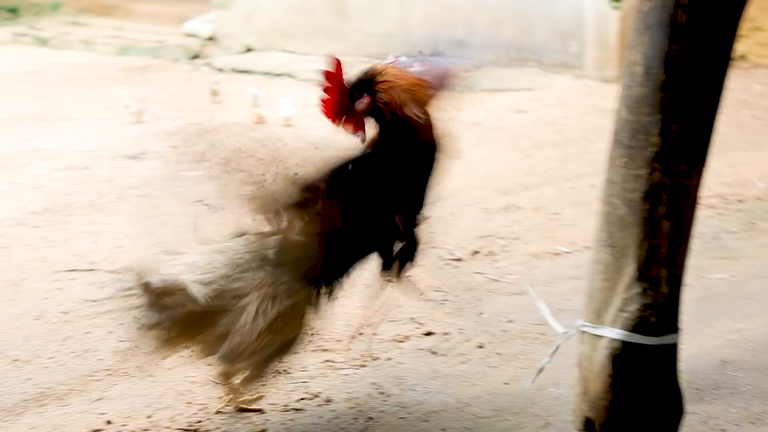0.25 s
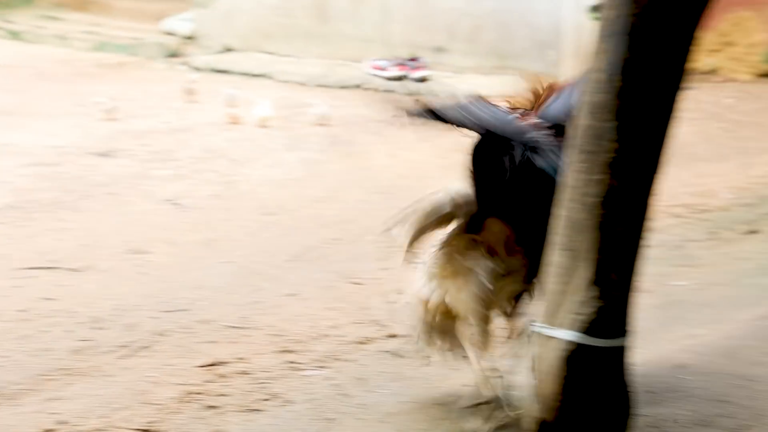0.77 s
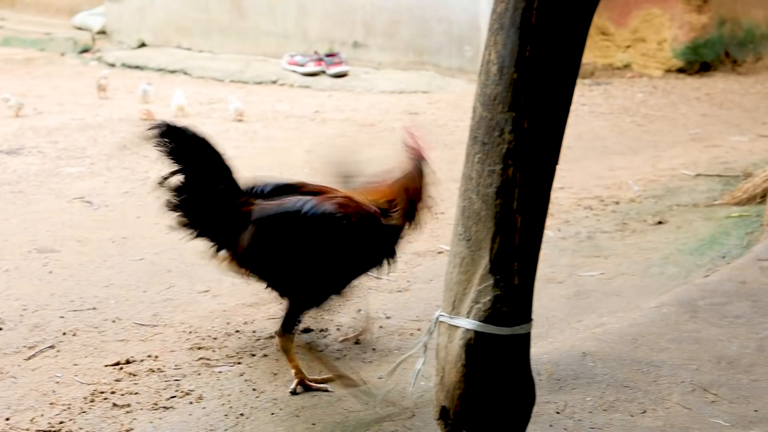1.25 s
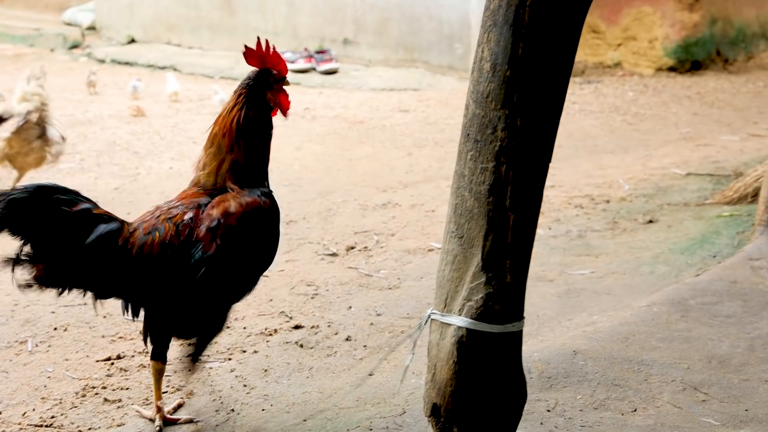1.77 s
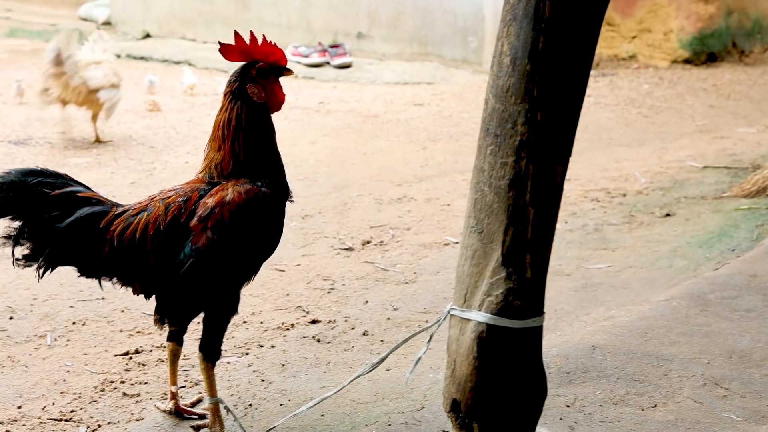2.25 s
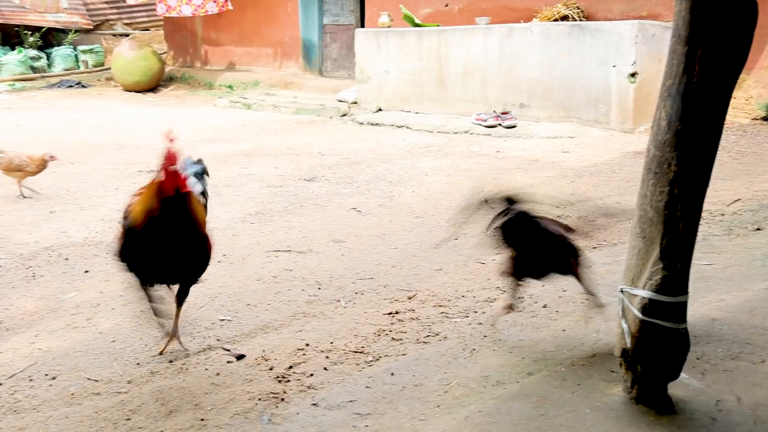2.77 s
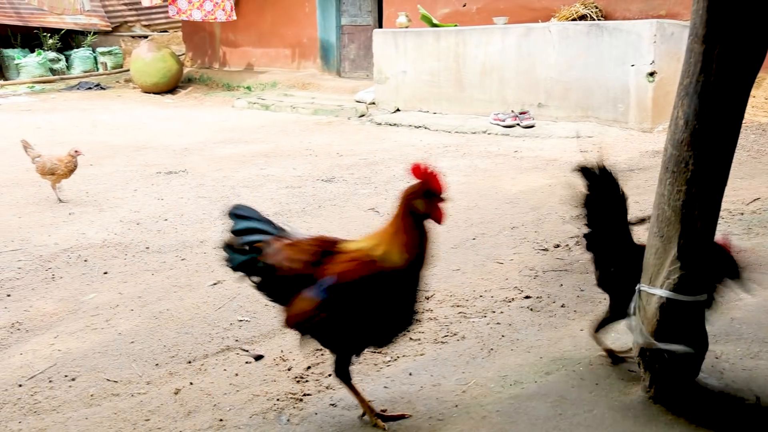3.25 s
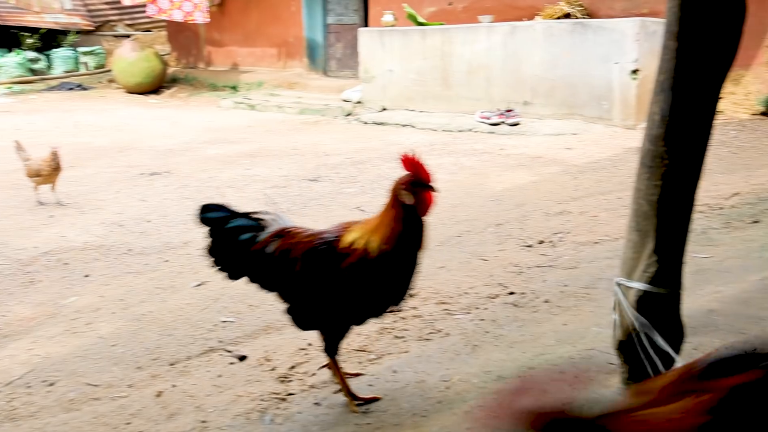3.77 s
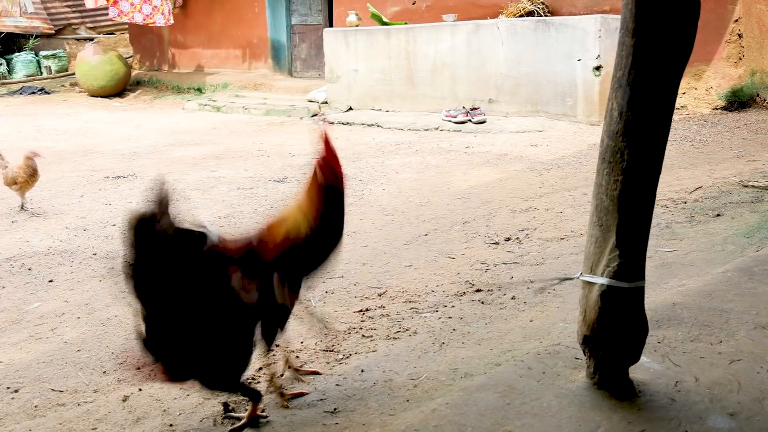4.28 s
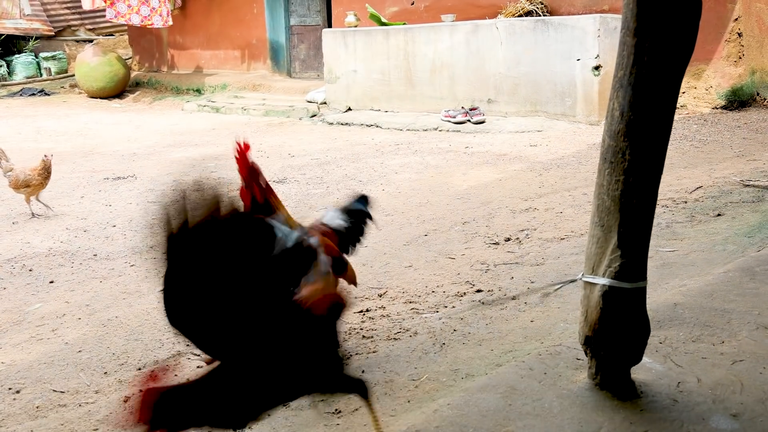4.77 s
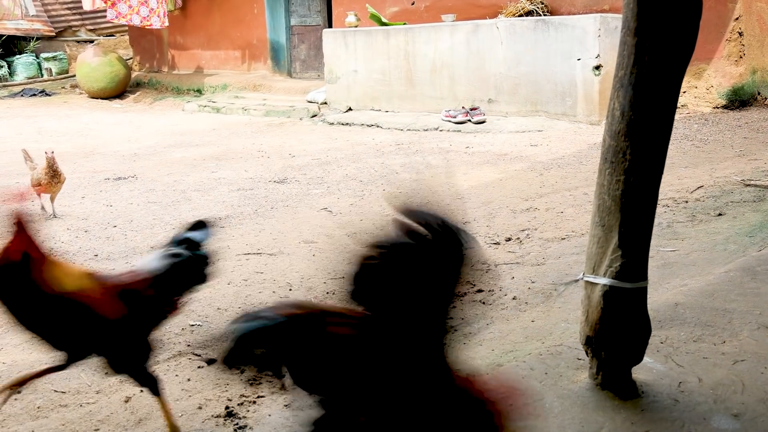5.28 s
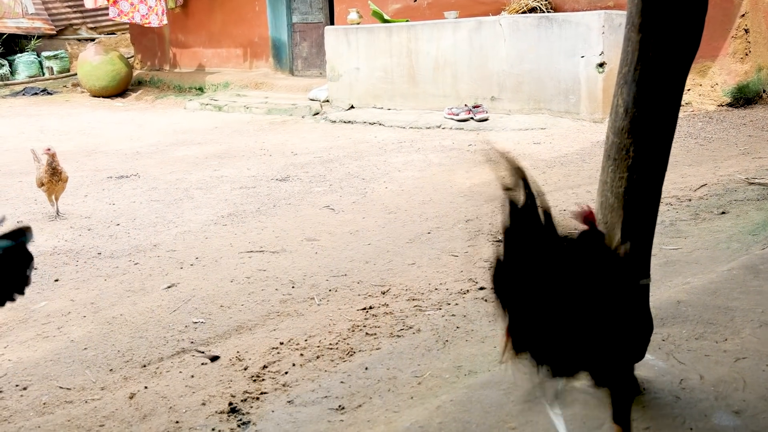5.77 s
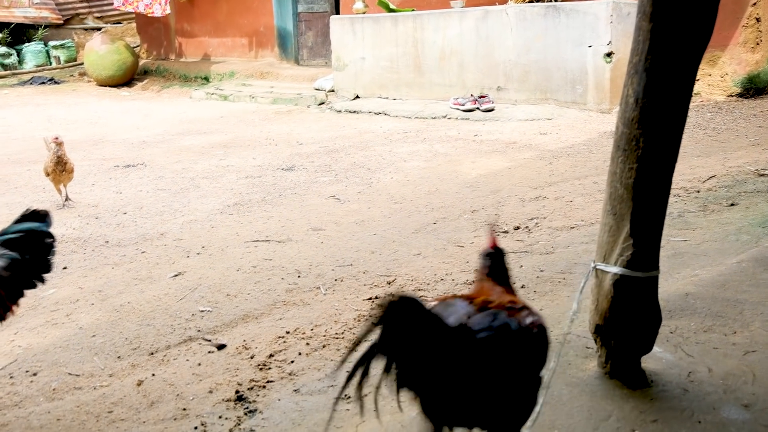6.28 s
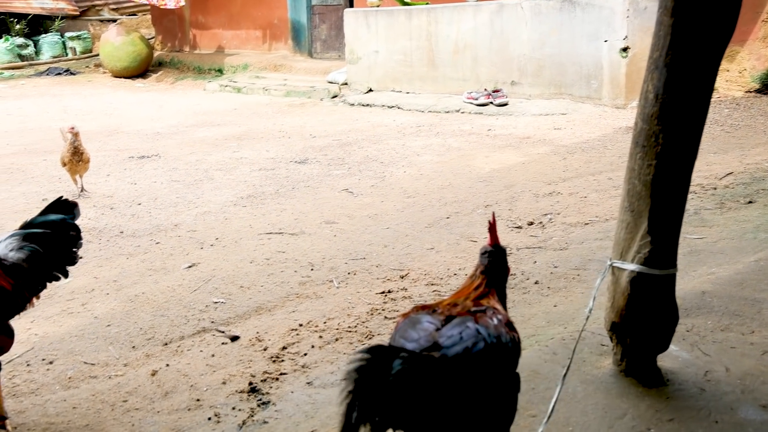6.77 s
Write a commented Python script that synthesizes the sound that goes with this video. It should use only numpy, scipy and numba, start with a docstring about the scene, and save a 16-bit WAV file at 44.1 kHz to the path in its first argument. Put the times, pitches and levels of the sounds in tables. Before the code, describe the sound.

Harsh squawks and short clucks from a scuffling rooster, with thumping wings, scraping claws and faint chick peeps outdoors.

```python
"""A tethered rooster growls, clucks and squawks harshly while scuffling with another in a walled dirt yard.
Its voice is membrane pulses and air noise ringing in throat and beak. Wing beats thump, feathers swish,
claws scrape and grit ticks. Chicks peep nearby; far chirps, a small bird and an insect sound behind them.
Air buffets the microphone, the yard murmurs and the house walls answer each call."""
import sys
import numpy as np
from scipy import signal
from scipy.fft import rfft, irfft, next_fast_len
from scipy.io import wavfile
from scipy.ndimage import uniform_filter1d, map_coordinates
from numba import njit

SR = 44100
rng = np.random.default_rng(int(sys.argv[2]) if len(sys.argv) > 2 else 0)


def unload_wav(signal):
    """Save mono or channel-first audio to the path in sys.argv[1] as 16-bit WAV at rate SR, clipped to [-1, 1]."""
    wavfile.write(
        sys.argv[1],
        SR,
        np.round(np.clip(np.atleast_2d(signal).T, -1, 1) * 32767).astype(np.int16),
    )


N = 310023
TIME_S = np.arange(N) / SR
TOP_HZ = 16000


def amp(db):
    """Decibels to gain."""
    return 10 ** (np.asarray(db) / 20)


def unit(x):
    """Scale to rms 1."""
    return x / np.sqrt(np.mean(x ** 2) + 1e-20)


def along(points, hz):
    """Read (frequency [Hz], value) points on a log axis."""
    knots_hz, values = np.transpose(points)
    return np.interp(np.log(hz + 1), np.log(knots_hz + 1), values)


def curves(rows, t):
    """Read each column after the time at times t."""
    knots, *columns = np.transpose(rows)
    return [np.interp(t, np.sort(knots), column) for column in columns]


def span(start_s, end_s):
    """Sample times of an interval."""
    return TIME_S[max(int(start_s * SR), 0):int(end_s * SR)]


def add(track, t, sound):
    """Mix a sound into a track at times t."""
    track[..., round(t[0] * SR):][..., :len(t)] += sound


def wobble(knots_per_s, size):
    """Smooth random curve."""
    knots = rng.standard_normal(int(size * knots_per_s / SR) + 4)
    return map_coordinates(knots, [np.arange(size) * knots_per_s / SR])


def filtered(x, response):
    """Zero-phase filter with gain response(hz)."""
    size = x.shape[-1]
    padded = next_fast_len(size + SR // 8)
    return irfft(rfft(x, padded) * response(np.fft.rfftfreq(padded, 1 / SR)), padded)[..., :size]


def coloured(x, spectrum):
    """Filter by (frequency [Hz], gain [dB]) points."""
    return filtered(x, lambda hz: amp(along(spectrum, hz)))


@njit
def resonate(x, hz, width_hz):
    """Moving two-pole resonance, peak gain 1."""
    y = np.zeros(len(x))
    r = np.exp(-np.pi * width_hz / SR)
    for i in range(2, len(x)):
        drive = (1 - r * r) / 2 * (x[i] - x[i - 2])
        y[i] = drive + 2 * r * np.cos(2 * np.pi * hz[i] / SR) * y[i - 1] - r * r * y[i - 2]
    return y


# Likeness of the two microphone ports: (frequency [Hz], coherence [0-1])
PORT_COHERENCE = [(140, 0.025), (300, 1), (600, 0.76), (1500, 0.47), (5000, 0.033)]
def noise(spectrum, size, treble_db=0):
    """Stereo noise of rms 1, most coherent in the midrange."""
    def response(hz):
        angle = np.arccos(along(PORT_COHERENCE, hz)) / 2
        gain = amp(along(spectrum, hz) + treble_db * along([(1000, 0), (8000, 1)], hz))
        return gain * [np.cos(angle), np.sin(angle)]
    mid, side = filtered(rng.standard_normal((2, size)), response)
    return unit(np.array([mid + side, mid - side]))


# Background levels: (time [s], buffeting [dB], yard murmur [dB])
AIR_LEVELS = [(0, -49, -47.5), (.95, -50, -46.5), (1.05, -37, -47), (2.5, -36.5, -51), (2.6, -57.5, -48),
              (5.2, -59, -52), (5.5, -79.5, -56.5), (6.05, -58.5, -59.5), (6.55, -57, -51.5)]
# Turbulence at a port: (frequency [Hz], density [dB])
BUFFET_SPECTRUM = [(20, -33.5), (65, -0.5), (110, 1.5), (200, -6), (450, -25.5), (900, -62)]
def buffeting():
    """Air hits each port in separate low gusts."""
    level_db, _ = curves(AIR_LEVELS, TIME_S)
    gusts = unit(amp(4 * np.array([wobble(22, N), wobble(22, N)])))
    return amp(level_db) * gusts * noise(BUFFET_SPECTRUM, N) * amp([[-2], [2]])


def insect(trill_hz=6):
    """Far trill: a narrow, pulsing noise band."""
    band = noise([(5400, -45), (6300, 0.5), (6700, -3.5), (7100, -42.5)], N)
    return amp(-12 + 1.3 * np.sin(2 * np.pi * trill_hz * TIME_S)) * band


# Yard murmur: (frequency [Hz], density [dB])
YARD_SPECTRUM = [(60, -23), (150, -1.5), (350, -5.5), (550, -11), (1800, -16.5), (6000, -25), (15000, -42)]
def yard():
    """Murmur and insect waver together in level."""
    _, level_db = curves(AIR_LEVELS, TIME_S)
    trill = insect()
    return amp(level_db + 2.5 * wobble(7.6, N)) * (noise(YARD_SPECTRUM, N) + trill)


def whistle(pitch_hz, blur):
    """Nearly pure bird tone; blur is the relative pitch jitter."""
    phase = 2 * np.pi * np.cumsum(pitch_hz * (1 + blur * wobble(506, len(pitch_hz)))) / SR
    return np.sin(phase) + amp(-29) * np.sin(2 * phase)


# Whistled glide: (time [s], pitch [Hz], level [dB])
BIRD_GLIDE = [(6.13, 7740, -70), (6.212, 5620, -59), (6.259, 5380, -71), (6.29, 5530, -74)]
def small_bird():
    """One faint whistle sliding down."""
    out = np.zeros(N)
    t = span(BIRD_GLIDE[0][0], BIRD_GLIDE[-1][0])
    pitch_hz, db = curves(BIRD_GLIDE, t)
    add(out, t, amp(db) * whistle(pitch_hz, blur=0.0039))
    return out


# Falling chirps: the first three are straight sliding peeps of another chick, the rest distant chirps: (time
# [s], top pitch [Hz], level [dB], length [s])
FALLING_CHIRPS = [(1.485, 4850, -47.5, .055), (1.745, 4800, -49, .052), (2.06, 4800, -52, .058),
                  (2.58, 5800, -56, .1), (2.755, 6410, -51.5, .1), (3.21, 6000, -57, .1), (3.83, 4800, -55, .1),
                  (4.33, 4750, -53.5, .1)]
def falling_chirps(fall=0.17, blur_per_s=0.55):
    """Thin falling chirps; the longer, distant ones blur more."""
    out = np.zeros(N)
    for s, top_hz, db, length_s in FALLING_CHIRPS:
        t = span(s, s + length_s)
        tone = whistle(top_hz * (1 - fall * (t - s) / length_s), blur_per_s * length_s)
        add(out, t, amp(db) * signal.windows.tukey(len(t), 0.6) * tone)
    return out


# Chick peeps: (time [s], top pitch [Hz], relative level [dB], length [s])
CHICK_PEEPS = [(.09, 4607, -37, 0.085), (0.397, 4620, -37, 0.11), (0.684, 4610, -35, 0.081),
               (1.033, 4580, -37, 0.12), (1.907, 4290, -48.5, 0.075), (2.231, 4330, -46.5, 0.087),
               (2.355, 3900, -51.5, 0.076), (2.476, 4500, -50, 0.12)]
# Pitch arch of a peep: (progress [0-1], share of top pitch [0-1])
PEEP_CONTOUR = [(0, .94), (.2, 1), (.46, .99), (.6, .93), (.72, .73), (1, .62)]
def chicks():
    """Each peep holds a high arch, then breaks to a low note."""
    out = np.zeros(N)
    for s, top_hz, db, length_s in CHICK_PEEPS:
        t = span(s, s + length_s)
        pitch_hz = top_hz * curves(PEEP_CONTOUR, (t - s) / length_s)[0]
        add(out, t, amp(db - 2.5) * signal.windows.tukey(len(t), 0.2) * whistle(pitch_hz, blur=0.0095))
    return out


# Bouts of struggling: (start [s], end [s], level [dB])
STRUGGLES = [(0, 1.2, -51), (0.282, 0.846, -47), (1.394, 1.462, -44.5), (2.58, 2.964, -44),
             (3.143, 3.556, -42), (3.36, 3.38, -36), (3.823, 4.12, -45.5), (4.26, 5.313, -49.5),
             (6.346, 7.033, -57)]
# Feathers and dust: (frequency [Hz], density [dB])
RUSTLE_SPECTRUM = [(300, -20), (1000, 7), (3000, 2.5), (5000, 0.5), (8000, -5), (15000, -9)]
def rustle(attack_s=0.014, release_s=0.095, calm_db=-61.5):
    """Each bout stirs feathers and dust, which settle to a faint floor."""
    power = amp(calm_db) ** 2
    for start_s, end_s, db in STRUGGLES:
        edge = np.minimum((TIME_S - start_s) / attack_s, (end_s - TIME_S) / release_s)
        power += (amp(db) * np.exp(np.minimum(0, edge))) ** 2
    grains = unit(amp(1.8 * wobble(30, N) + 3.5 * wobble(900, N)))
    return np.sqrt(power) * grains * noise(RUSTLE_SPECTRUM, N)


# Grit and quill clicks: (time [s], level [dB])
GRIT_TICKS = [(.077, -36.5), (.35, -35.5), (.375, -28), (1.926, -38), (2.2696, -17), (2.689, -22.5),
              (2.7379, -24), (2.871, -31), (3.3524, -28)]
def ticks(decay_s=0.0014):
    """Grit and quills click by the microphone, too near to echo."""
    out = np.zeros((2, N))
    for s, db in GRIT_TICKS:
        t = span(s, s + 0.021)
        hiss = noise([(800, -12.5), (4500, -6), (16000, -12.5)], len(t))
        add(out, t, amp(db) * np.exp((s - t) / decay_s) * hiss)
    return out


# Swishes and scrapes: (peak time [s], level [dB], decay [s], treble [dB])
SCUFF_STROKES = [(0.335, -31, 0.033, -7.5), (0.49, -28, 0.024, -6.5), (0.584, -28, 0.02, -1.5),
                 (0.739, -34, 0.037, -1), (2.575, -29, 0.011, -8.5), (2.738, -27, 0.0052, -12),
                 (2.881, -29, 0.012, -4.5), (2.921, -31.5, 0.025, -10), (3.237, -24.5, 0.011, -35.5),
                 (3.405, -28.5, 0.0091, 7.5), (3.575, -21.5, 0.0065, 27), (4.005, -26.5, 0.018, 0),
                 (4.059, -33, 0.0065, -16), (4.107, -33.5, 0.014, -4.5), (4.19, -27.5, 0.01, -8),
                 (4.295, -32, 0.018, 7.5), (4.552, -33.5, 0.022, -14)]
# Feather friction: (frequency [Hz], density [dB])
FEATHER_SPECTRUM = [(100, -4.5), (350, -5.5), (1000, -2.5), (2500, -6), (5000, -8), (8000, -15),
                    (16000, -18)]
def scuffle(snaps_per_s=260, snap_decay_s=0.00047, snap_db=-6):
    """Feathers and claws rub in a grainy hiss; quills snap past each other."""
    out = np.zeros((2, N))
    for s, db, decay_s, treble_db in SCUFF_STROKES:
        rise_s = decay_s ** 2 / 0.031  # short scrapes strike, long swishes swell
        t = span(s - 4 * rise_s, s + 5 * decay_s)
        stroke = np.exp(np.minimum((t - s) / rise_s, (s - t) / decay_s))
        triggers = rng.random(len(t)) < snaps_per_s / SR
        snaps = signal.lfilter([1], [1, -np.exp(-1 / (snap_decay_s * SR))], triggers)
        friction = unit(amp(2 * wobble(700, len(t))))
        grains = unit(friction + amp(snap_db) * unit(snaps))
        add(out, t, amp(db) * stroke * grains * noise(FEATHER_SPECTRUM, len(t), treble_db))
    return out


# Downstrokes: (time [s], relative level [dB], pitch [Hz])
WING_BEATS = [(0.029, -33.5, 105), (0.329, -20, 148), (1.004, -25, 84), (1.032, -22, 230), (1.439, -21, 97),
              (1.82, -25, 130), (2.104, -17, 161), (2.179, -24, 96), (2.2, -17, 126), (2.237, -19.5, 197),
              (2.316, -20.5, 163), (2.89, -30.5, 183), (3.243, -35, 322), (3.491, -33, 190),
              (4.091, -35.5, 230), (4.191, -29.5, 305), (5.033, -38.5, 278), (5.17, -33.5, 181)]
def wings():
    """A downstroke pushes and pulls the air once; its turbulent puff differs at each port."""
    out = np.zeros((2, N))
    for s, db, hz in WING_BEATS:
        t = span(s - 0.025, s + 0.15)
        cycles = (t - s) * hz + rng.normal(0, 0.039, (2, 1))
        push = -np.sin(2 * np.pi * cycles) * np.exp(-(cycles / 0.67) ** 2)
        puff = 0.77 * np.exp(-np.abs(t - s) / 0.008) * noise(BUFFET_SPECTRUM, len(t))
        add(out, t, amp(db) * (push + puff) * amp([[-2], [1]]))
    return out


BEAK_TRADE = 1.05  # dB of beak resonance gained per dB of throat share lost
# Radiation from the beak: (frequency [Hz], gain [dB])
BEAK_RADIATION = [(120, -14), (300, 3), (450, 1), (1500, 2.5), (3000, -1), (4100, -2), (4900, -5.5),
                  (5700, -1.5), (7000, -11.5), (8500, -17), (16000, -32)]
def syrinx(pitch_hz, effort_db, rough, throat_hz, beak_hz, beak_db, upper_hz, upper_db,
           throat_width_hz, beak_width_hz, rasp_db, jitter=0.073, air_gain=1.36, smear=0.5):
    """Membrane pulses and pulsed air ring in throat, beak and an upper resonance; steady rms 1."""
    size = len(pitch_hz)
    rough = np.clip(rough, 0, 1)
    drift = 1 + jitter * rough * (wobble(600, size) + wobble(140, size))
    phase = 2 * np.pi * np.cumsum(pitch_hz * drift) / SR
    k = np.arange(1, 41)[:, None]
    harmonics = np.cos(k * phase + smear * k * k)  # the long windpipe smears each pulse
    pulses = np.sum(harmonics * (k * pitch_hz < TOP_HZ), axis=0) * np.sqrt(2 * pitch_hz / TOP_HZ)
    # a strained membrane beats unevenly, slips to half pitch and leaks air once a cycle
    pulses *= amp(5.3 * rough * wobble(600, size))
    pulses *= 1 + rough * (1 + wobble(90, size)) * np.cos(phase / 2)
    air = unit(rng.standard_normal(size) * (1 + np.cos(phase)))
    source = np.sqrt(1 - rough ** 2) * pulses + air_gain * rough * air

    def cavity(hz, width_hz):
        hz = hz * np.ones(size)
        return resonate(resonate(source, hz, width_hz), hz, width_hz)
    throat = cavity(throat_hz, throat_width_hz)
    beak = amp(beak_db) * cavity(beak_hz, beak_width_hz)
    rasp = amp(rasp_db + 0.56 * effort_db) * source  # louder calls are brighter
    treble = (1 + amp(beak_db)) * (amp(upper_db) * cavity(upper_hz, 620) - rasp)
    tone = coloured(throat + beak + treble, BEAK_RADIATION)
    return tone / np.sqrt(np.abs(uniform_filter1d(tone ** 2, size=360)) + 1e-12)


# Rattling growl: (time [s], level [dB], throat [Hz], beak [Hz], throat share [dB],
# upper resonance [Hz], rattle depth [0-1])
GROWL_TRACK = [(1.04, -27, 1170, 1259, 14, 3200, 0.88), (1.08, -28.5, 1140, 1256, 5, 3200, 0.97),
               (1.125, -24.5, 1030, 1679, -3.5, 3150, 0.4), (1.172, -22, 1090, 1695, -8.5, 3300, 0.15),
               (1.235, -28.5, 856, 1505, 0, 3400, 0.77), (1.268, -21.5, 765, 1441, -3, 3920, 0.72),
               (1.335, -25.5, 770, 1381, -3.5, 3800, 0.93), (1.405, -25, 740, 1336, 0, 3850, .7),
               (1.44, -34, 697.5, 1260, 1, 3905, 0.4)]
# Colour of the rattle: (frequency [Hz], gain [dB])
GROWL_COLOUR = [(1800, 1), (4300, 4), (5200, -4), (7000, -8)]
def growl(rattle_hz=58, rattle_db=5, swap_db=9):
    """A flutter chops the voice into bursts: the throat sounds in each, the beak between them."""
    t = span(GROWL_TRACK[0][0], GROWL_TRACK[-1][0])
    db, throat_hz, beak_hz, throat_db, upper_hz, depth = curves(GROWL_TRACK, t)
    flutter = 2 * np.pi * np.cumsum(rattle_hz * (1 + 0.14 * wobble(50, len(t)))) / SR
    burst = depth * np.cos(flutter)
    bend = 1 - 0.1 * depth * np.sin(flutter)
    beak_db = -3.5 - BEAK_TRADE * throat_db - swap_db * burst
    tone = syrinx(0.49 * beak_hz * bend, db, rough=0.54, throat_hz=throat_hz * bend,
                  beak_hz=beak_hz, beak_db=beak_db, upper_hz=upper_hz, upper_db=-20 + 1.8 * burst,
                  throat_width_hz=294, beak_width_hz=340, rasp_db=-18)
    chop = unit(amp(rattle_db * burst + 2.2 * wobble(70.3, len(t))))
    return t, coloured(tone, GROWL_COLOUR) * amp(db) * chop * signal.windows.tukey(len(t), 0.04)


# Clucks: (peak time [s], level [dB], pitch [Hz], half length [s], throat [Hz], beak [Hz],
# beak over throat [dB])
CLUCK_CALLS = [(1.555, -29.5, 356, 0.0052, 764, 970, -13), (1.585, -23, 389, .0073, 766, 930, -9),
               (1.614, -22, 409.5, 0.0095, 820, 1140, 2.5), (1.698, -18, 441.7, 0.0087, 900, 1230, 4.5),
               (1.888, -30.5, 348.6, 0.0092, 717, 960, -19), (1.913, -26.5, 386.4, 0.0042, 760, 970, -23),
               (2.141, -32.5, 357, 0.0097, 680, 990, -14), (2.165, -29, 372, .0035, 740, 1090, -18),
               (2.253, -17.5, 353.2, 0.0066, 800, 1320, 5),
               (2.333, -30.5, 411.6, 0.0084, 1026, 1270, -13.5),
               (2.404, -28.5, 375.4, .012, 714, 1000, -13.5), (2.51, -18.5, 425.5, 0.0074, 900, 1190, 8),
               (3.734, -20, 372.8, .013, 724, 1750, 6.5), (3.964, -20.5, 428.6, .011, 520, 1174, 8),
               (3.986, -24.5, 401.7, 0.0076, 1040, 1250, -5.5),
               (4.89, -10.5, 544, 0.0074, 1596, 2120, -4.5), (5.06, -16, 554, 0.0093, 1250, 1793, 4),
               (5.527, -18, 356, 0.014, 866, 1625, 8), (5.739, -24, 369.5, 0.014, 740, 1590, 2.5),
               (6.48, -42.5, 361.5, .018, 660, 1073, -0.5)]
# The body carries the fundamental: (frequency [Hz], gain [dB])
CHEST_COLOUR = [(250, 1), (400, 6.5), (600, 1), (3000, -1), (4800, -4), (6000, -1)]
def clucks(typical_db=-19, sag=0.1025):
    """Short pushes of air; pitch arches with effort, and onset and end are hoarse."""
    for s, db, top_hz, half_s, throat_hz, beak_hz, beak_db in CLUCK_CALLS:
        t = span(s - 2.3 * half_s, s + 3 * half_s)
        effort = 1 / (1 + ((t - s) / half_s) ** 4)
        excess_db = db - typical_db
        rough = 0.33 - 0.05 * excess_db + 0.51 * (1 - effort)  # louder is clearer
        pitch_hz = top_hz * (1 - sag * (1 - effort))
        tone = syrinx(pitch_hz, db, rough, throat_hz, beak_hz, beak_db,
                      upper_hz=3450, upper_db=-19 + 0.67 * excess_db,
                      throat_width_hz=252, beak_width_hz=317, rasp_db=-20, smear=0.11)
        yield t, amp(db) * effort * coloured(tone, CHEST_COLOUR)


# Effort and mouth, one list per squawk: (time [s], level [dB], beak [Hz], throat share [dB])
SQUAWK_EFFORT = [
    [(3.06, -44, 1710, 5), (3.07, -25, 1700, -4), (3.1, -24, 2020, -3.5), (3.188, -22.5, 1570, -3.5),
     (3.222, -32, 1620, 1), (3.232, -49, 1590, 8)],
    [(3.27, -43, 2830, -1), (3.29, -24.5, 2830, -3), (3.345, -26, 3020, -17.5), (3.364, -16, 3280, -23),
     (3.38, -21.5, 2880, -3), (3.402, -11.5, 2780, -8.5), (3.43, -27.5, 2580, -21)],
    [(3.485, -48, 2250, 0), (3.501, -18, 2250, 7), (3.533, -21, 2580, -20), (3.557, -12, 2870, -24.5),
     (3.581, -17, 1910, -11), (3.605, -48, 2100, 5)],
    [(4.595, -32, 1820, 6), (4.632, -16, 1800, -4), (4.68, -15, 1960, -7), (4.704, -19.5, 2340, -3),
     (4.73, -10.5, 2570, -15.5), (4.746, -14.5, 1880, -3.5), (4.78, -30, 1660, -14.5)],
    [(5.19, -41, 2000, 0), (5.204, -17, 2120, -8), (5.244, -17.5, 2040, -10), (5.274, -13, 2750, -14.5),
     (5.318, -12.5, 2760, -13.5), (5.35, -11, 2100, -22.5), (5.37, -15, 1850, -26.5),
     (5.382, -36.5, 1980, -14)],
]
# Membranes, one list per squawk; leaps are register cracks: (time [s], pitch [Hz], roughness [0-1])
SQUAWK_MEMBRANES = [
    [(3.06, 586, 0.78), (3.11, 620, 0.03), (3.128, 576, 0.28), (3.148, 393, 0.24), (3.2, 390, 0.17),
     (3.23, 355, 0)],
    [(3.272, 659.6, 0.26), (3.305, 764, 0.48), (3.345, 764, 0.03), (3.354, 1115, 0.41), (3.375, 1071, 0.27),
     (3.402, 734.5, 0.96), (3.425, 609, 1)],
    [(3.492, 666.3, 0.27), (3.505, 780, 0.35), (3.527, 823, 0.75), (3.548, 763.5, 0.16), (3.567, 727, 0.26),
     (3.582, 532, 0.5)],
    [(4.59, 695, 0.67), (4.634, 849.6, 0.51), (4.667, 847.7, 0.38), (4.685, 1032, 0.6), (4.7, 1040, 0.61),
     (4.718, 1160, 0.76), (4.736, 871.5, 0.55), (4.775, 780, 0.4)],
    [(5.19, 817, 0.58), (5.225, 955, 0.77), (5.272, 976.6, 0.6), (5.289, 1482, 0.47), (5.3, 1319, 0.2),
     (5.315, 1390, 0.12), (5.325, 1446, 0.42), (5.335, 1392, 0.1), (5.343, 1400, 0), (5.347, 698, 0.01),
     (5.38, 640, 0.33)],
]
# Wide-open beak: (frequency [Hz], gain [dB])
SQUAWK_COLOUR = [(400, 4), (800, 2), (4300, 0), (5500, -1.5), (9000, 1.5)]
def squawks(throat_rest_hz=757, tremble=0.02):
    """Forced, shaking calls; the throat tunes up to high pitches while the beak opens and shuts."""
    for effort, membranes in zip(SQUAWK_EFFORT, SQUAWK_MEMBRANES):
        t = span(effort[0][0], effort[-1][0])
        db, beak_hz, throat_db = curves(effort, t)
        pitch_hz, rough = curves(membranes, t)
        pitch_hz *= 1 + tremble * wobble(130, len(t))
        throat_hz = np.maximum(throat_rest_hz, pitch_hz)
        tone = syrinx(pitch_hz, db, rough, throat_hz, beak_hz, beak_db=-3 - BEAK_TRADE * throat_db,
                      upper_hz=1.44 * beak_hz, upper_db=-13, throat_width_hz=290, beak_width_hz=740,
                      rasp_db=-16, jitter=0.0729, air_gain=1.45)
        tone -= resonate(tone, 0.4 * pitch_hz, 400)  # notch below the fundamental
        yield t, coloured(tone, SQUAWK_COLOUR) * amp(db) * signal.windows.tukey(len(t), 0.04)


# Position of the caller: (time [s], left port lag [ms], left over right [dB])
ROOSTER_POSITION = [(1.2, -0.064, 0), (2.5, -0.088, 0), (3.1, 0.11, -2.5), (4, 0.088, 0.5),
                    (4.65, -0.061, 0), (5.05, -0.13, -0.5), (5.3, -.057, 0), (5.52, 0.093, -0.5)]
def rooster(split_hz=750):
    """All calls; lows reach both ports alike, treble shifts in level and delay with position."""
    voice = np.zeros(N)
    for t, call in [growl(), *squawks(), *clucks()]:
        add(voice, t, call)
    low = filtered(voice, lambda hz: 1 / (1 + (hz / split_hz) ** 4))
    lag_ms, pan_db = curves(ROOSTER_POSITION, TIME_S)
    ports = []
    for side in (0.5, -0.5):
        treble = map_coordinates(voice - low, [np.arange(N) - side * lag_ms * SR / 1000])
        ports.append(low + amp(side * pan_db) * treble)
    return np.array(ports)


# Yard reverberation: (frequency [Hz], T60 [s])
WALL_DECAY = [(200, 0.29), (800, 0.43), (2000, 0.29), (5000, 0.068), (12000, 0.12)]
def wall_echo(x, tail_db=-16):
    """The walls return four early slaps on a thin tail, different at each port."""
    hz, t, spectra = signal.stft(rng.standard_normal((2, SR // 2)), SR, nperseg=256)
    decay = amp(-60 * t / along(WALL_DECAY, hz)[:, None])
    _, response = signal.istft(spectra * decay, SR, nperseg=256)
    response *= amp(tail_db) / np.linalg.norm(response[0])
    for delay_s, db in [(0.0035, -17.5), (0.008, -11), (0.014, -22.5), (0.022, -18.5)]:
        taps = (delay_s * SR * rng.uniform(0.9, 1.1, 2)).astype(int)
        response[[0, 1], taps] += amp(db)
    return signal.fftconvolve(x, response, axes=1)[:, :N]


def scene():
    """Birds in the yard; calls and scuffle echo, the small birds most."""
    peeps = chicks() + small_bird() + falling_chirps()
    near = rooster() + scuffle()
    echo = wall_echo(near + amp(14.5) * peeps)
    return near + peeps + echo + ticks() + wings() + buffeting() + yard() + rustle()


# Port mismatch: (frequency [Hz], right over left [dB])
PORT_BALANCE = [(600, -1.5), (2000, 2), (4000, -0.5), (8000, 0.5)]
def record(dry):
    """Two ports of unequal colour, clipped at full scale and band-limited."""
    ports = filtered(dry, lambda hz: amp(np.outer([-0.5, 0.5], along(PORT_BALANCE, hz))))
    return filtered(np.clip(ports, -1, 1), lambda hz: hz < TOP_HZ)


dry = scene()
out = record(dry)
unload_wav(out)
```